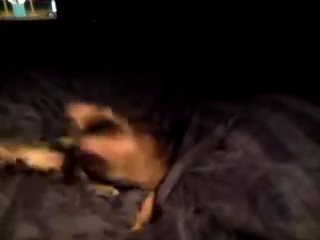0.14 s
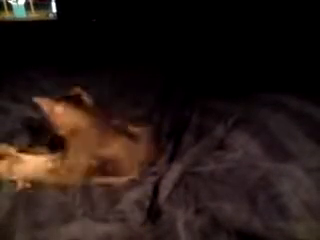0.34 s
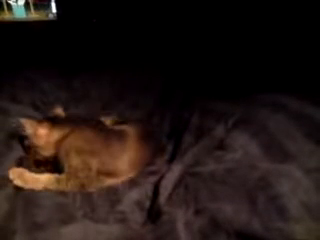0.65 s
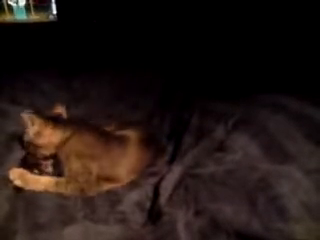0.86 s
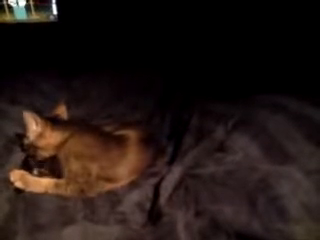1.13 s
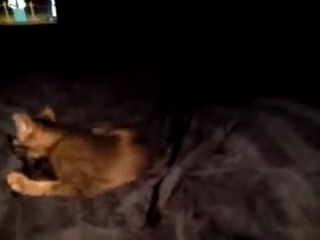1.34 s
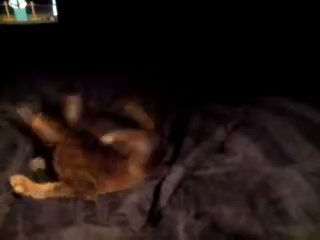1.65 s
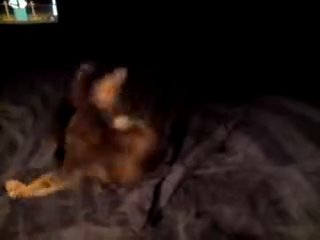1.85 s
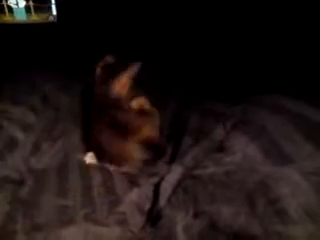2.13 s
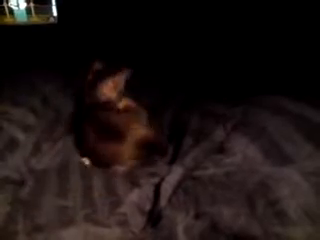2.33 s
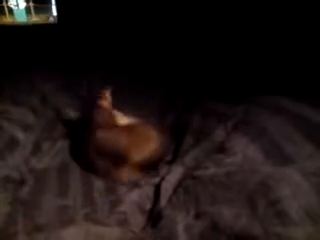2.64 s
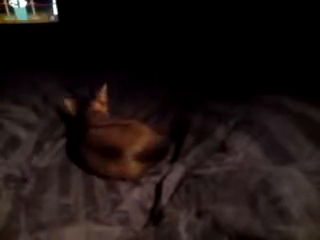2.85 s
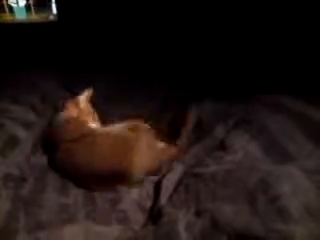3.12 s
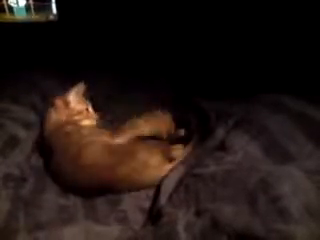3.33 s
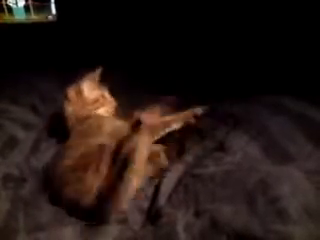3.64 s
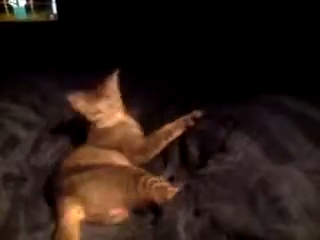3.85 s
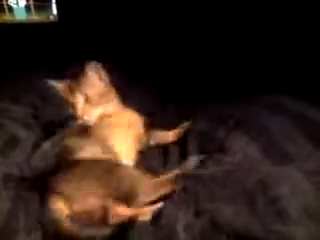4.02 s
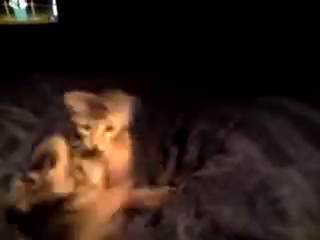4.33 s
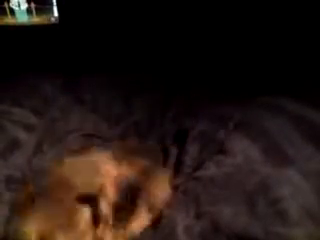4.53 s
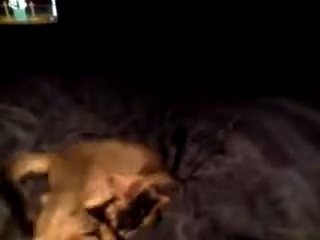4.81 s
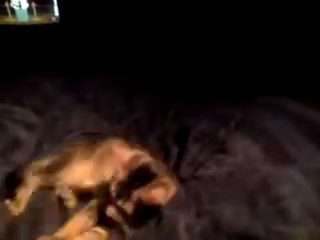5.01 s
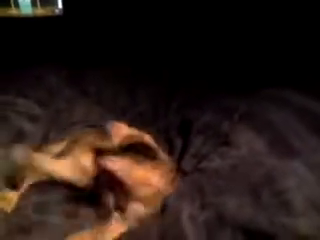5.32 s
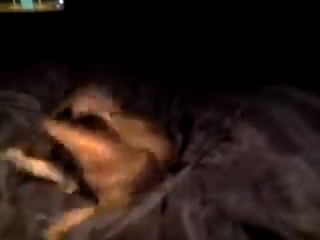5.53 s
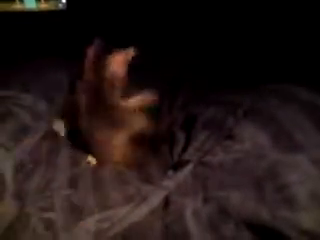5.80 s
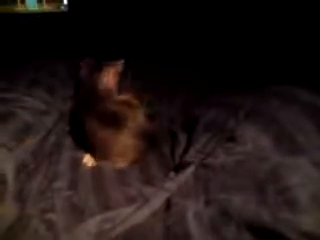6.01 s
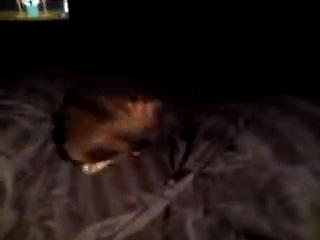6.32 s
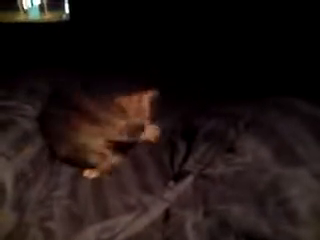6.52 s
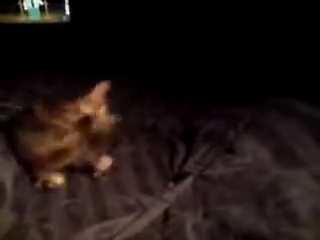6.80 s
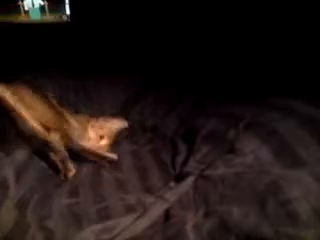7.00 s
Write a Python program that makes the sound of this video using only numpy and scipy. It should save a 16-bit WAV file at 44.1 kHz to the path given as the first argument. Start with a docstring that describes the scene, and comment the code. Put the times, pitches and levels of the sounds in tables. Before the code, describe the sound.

Restless cloth rustling, tiny claw crackles and soft low thumps from a kitten playing on a bed, broken once by a loud hard click.

```python
"""A quiet room with a blanket over a soft bed, where a kitten rolls and scrabbles, heard by one small microphone.
Fur and paws rub the cloth: shaped hiss and clumped fibre clicks, swelling and fading with each stroke.
The weight shoves the bedding (lumpy low noise); paw pats and body drops are short decaying sines.
Claws catch threads in brief ringing crackles, taut cloth squeaks faintly as a wavering tone,
and once something small and hard snaps sharply: a handful of modes over the steady room noise."""
import sys
import numpy as np
from scipy import signal
from scipy.fft import rfft, irfft
from scipy.io import wavfile

SR = 44100
rng = np.random.default_rng(int(sys.argv[2]) if len(sys.argv) > 2 else 0)


def materialize(psi):
    """Save the field psi as 16-bit PCM at rate SR to the path in sys.argv[1].

    A 1-D psi becomes a single channel; in a 2-D psi each row is a channel.
    """
    bounded = np.clip(np.atleast_2d(psi).T, -1, 1)
    quanta = np.round(bounded * 32767).astype(np.int16)
    wavfile.write(sys.argv[1], SR, quanta)


N = 315756

# Strokes of paw or flank over the cloth: start_s (at full strength), hold_s, rub_level_db,
# fur_hiss_db (against the rubbing), weight_level_db (on the bedding), padding_level_db
STROKES = [(0.045, 0.038, -51.5, 2.2, -44, -50), (0.099, 0.097, -50, -1.5, -46, -55.2),
           (0.301, 0.059, -43.5, -6.0, -40.8, -44.5), (0.454, 0.049, -46.3, -3.7, -48, -53),
           (0.543, 0.018, -49, -1, -52, -67), (0.633, 0.047, -49.5, -1, -57, -56.7),
           (0.699, 0.104, -54.5, -2, -46, -65), (0.835, 0.12, -53.5, -1.7, -56.1, -65),
           (1.266, 0.019, -55, -4.5, -51, -69), (1.374, 0.024, -50.5, -6.5, -47, -54.9),
           (1.502, 0.069, -53, -3, -57, -57), (1.611, 0.112, -58.7, -6, -56, -63),
           (1.769, 0.046, -47.5, -2, -54, -61.7), (1.834, 0.065, -60.5, -2, -47.5, -58.5),
           (2.003, 0.013, -50.5, -0.7, -44, -53.5), (2.043, 0.04, -55, -1.5, -63, -54.5),
           (2.097, 0.0054, -51, 0.5, -45, -58), (2.19, 0.019, -50, -4.5, -41.5, -54),
           (2.252, 0.009, -46, -2, -44, -49.5), (2.501, 0.025, -43.5, -3.5, -38, -43.5),
           (2.557, 0.101, -52, -2, -44.5, -58.5), (2.706, 0.054, -52.5, -3, -50, -57.4),
           (2.973, 0.058, -56, -3, -48, -55.5), (3.041, 0.199, -56.5, -4.4, -56, -62),
           (3.259, 0.06, -53.5, -2, -61, -53), (3.497, 0.014, -46.5, -6, -40.6, -53),
           (3.568, 0.075, -51, -4, -42, -55), (3.687, 0.005, -46, -5, -60, -54),
           (3.749, 0.007, -43, -5, -38, -48), (3.858, 0.05, -44.5, -13, -48, -51.5),
           (3.962, 0.042, -48.5, -16, -56, -53), (4.045, 0.025, -39.5, -8, -42.5, -44.5),
           (4.19, 0.007, -48.7, -1.5, -47, -47), (4.29, 0.005, -46, -5.0, -45, -48.1),
           (4.378, 0.025, -51, -5, -59, -56), (4.414, 0.151, -57, -1.5, -51, -68),
           (4.555, 0.0072, -55, -2, -47.7, -49), (4.636, 0.086, -48.0, -3, -41, -52),
           (4.736, 0.063, -49.5, -5, -46, -59), (4.862, 0.045, -53.5, 0, -51, -58.5),
           (4.963, 0.075, -50, -2.8, -45, -54), (5.086, 0.11, -52, -1.2, -49.5, -54.5),
           (5.404, 0.056, -49, -0.8, -47, -52), (5.505, 0.014, -43.5, -2.3, -41.5, -50.5),
           (5.582, 0.045, -46, -4.5, -49, -51), (5.655, 0.059, -47.0, -2, -42.5, -52),
           (5.788, 0.11, -51.5, 0.3, -48.5, -51), (6.001, 0.014, -46, -1, -46, -48.5),
           (6.017, 0.015, -48, 0, -42.5, -59), (6.073, 0.11, -64, -6, -49, -66.0),
           (6.391, 0.114, -54, -2, -46, -55.5), (6.642, 0.0092, -43, -6.5, -36, -48),
           (6.891, 0.095, -52.0, -1.7, -53, -51.5), (7.03, 0.1, -51.9, -0.2, -62.0, -63)]
# Restlessness between strokes: time_s, rub_level_db, weight_level_db (on the bedding)
RESTLESS = [(0.0, -46.5, -43.5), (0.8, -62, -55.5), (1.59, -58.5, -55), (2.39, -56.5, -54.5),
            (3.18, -61, -53), (3.98, -51.5, -53), (4.77, -58, -55.5), (5.57, -59.8, -53.5),
            (6.36, -55.5, -52), (7.16, -52, -46.5)]
# Spectrum of rubbed cloth: frequency_hz, relative_level_db (per Hz)
CLOTH_SPECTRUM = [(290, -19), (500, -4.5), (624, -4), (744, -7), (1100, -5), (1200, -5.5), (1540, -4.5),
                  (1900, -0.5), (3610, -7), (4700, -1.5), (6550, -13), (7000, -24), (9100, -53.5),
                  (15400, -120)]
# Spectrum of the shoved bedding: frequency_hz, relative_level_db (per Hz)
BEDDING_SPECTRUM = [(11, -32.5), (18, 5.5), (32, 2.5), (92, -4), (113, -3.5), (160, -18), (210, -57),
                    (350, -120)]
# Spectrum of the padding under the paws: frequency_hz, relative_level_db (per Hz)
PADDING_SPECTRUM = [(88, -29.5), (150, -11.5), (167, -5.5), (243, 2), (403, -10), (613, -14.5),
                    (800, -10.5), (1040, -48.5), (1760, -120)]
# Claws catching threads: start_s, ring_peak_db, ring_hz, crackle_t60_s,
# crack_db and tug_db (both against the ring peak, before their own shaping)
CLAW_CATCHES = [(.2915, -30, 1390, 0.006, -17, 3), (0.2968, -26.5, 1760, 0.011, -16, 1.5),
                (0.325, -31, 1900, 0.0055, -11, 5.5), (0.358, -36, 1090, 0.0063, -13, -16),
                (.376, -29.5, 1750, .006, -4.5, -21), (0.4433, -37.5, 2290, 0.015, -9, -18),
                (.4743, -32, 2120, 0.0044, -9.5, 5.5), (0.5264, -40.5, 2380, .01, 5.5, -20),
                (.5522, -23.5, 1780, 0.035, -6.5, -22), (0.6465, -29.5, 3000, 0.0041, -2, -4.5),
                (0.663, -34.5, 1430, 0.021, -8.5, -12), (0.6844, -31.5, 2100, 0.0029, 7.5, -27),
                (1.3966, -42, 1470, 0.018, -12.5, -20), (2.0047, -39, 2060, .018, -4, -20),
                (2.0933, -38.5, 2030, 0.0099, -1, -14), (2.169, -34.5, 5130, 0.014, -21, -24),
                (2.5006, -32.5, 1970, .012, 3, -10), (2.509, -34.5, 2200, .01, -6.5, -11),
                (2.531, -29, 1220, 0.0039, -9.5, 1), (2.6187, -37, 2230, 0.014, -5.5, -11),
                (3.498, -32.5, 2780, 0.017, -25, -12), (3.7399, -30, 2600, .026, -7, -18),
                (3.7544, -39, 2190, 0.006, 0, -17), (3.795, -29.5, 4200, 0.013, -2.5, -17),
                (3.8445, -28.5, 1350, 0.017, -12, -17), (3.9484, -37, 1890, .008, -18, -15),
                (4.033, -23.5, 1110, 0.0083, -11, -27), (4.0483, -29, 1120, 0.01, -10.5, -18),
                (4.063, -35, 2260, .019, -6.5, -3), (4.0822, -31.5, 2320, 0.011, -1.5, -15),
                (4.187, -29, 2400, .015, -7.5, 1.5), (4.2828, -29.5, 1340, 0.008, -11, -12),
                (4.2915, -27.5, 1250, .02, -12.5, -24), (4.4733, -26.5, 2270, 0.015, -8.5, -26),
                (4.7344, -29.5, 1870, 0.007, -16, -1), (5.431, -40.5, 2090, 0.011, -0.5, -8),
                (5.4946, -30.5, 2360, .007, -3.5, 2.5), (5.622, -37, 2860, .01, -7.5, -14),
                (5.6542, -35.5, 2460, 0.013, -13.5, -6), (5.7066, -21, 4460, 0.0068, -7.5, -8.5),
                (5.7886, -36.5, 1960, .004, 1.5, -3), (6.0158, -37.5, 2260, 0.036, -7, -8),
                (6.4658, -31.5, 4580, .01, -2, -14), (6.482, -34, 2000, 0.0066, -15.5, -1.5),
                (6.6308, -33.5, 4530, .012, 5, -15.5), (6.648, -30, 5040, 0.0041, -12, -10),
                (6.665, -35, 1620, 0.0058, -14, -2), (7.1196, -33, 2060, .005, -5.5, 4)]
# Paw pats on the bed: start_s, level_db (before swell and decay), ring_hz
PAW_PATS = [(.233, -27, 276), (.442, -34.5, 258), (2.453, -34, 270), (2.519, -29, 244), (2.617, -29, 283),
            (3.509, -29.5, 259), (3.846, -45, 248), (3.891, -28.5, 256), (4.047, -30, 326),
            (4.182, -28.5, 249), (4.289, -31, 243), (4.722, -35, 224), (5.704, -35.5, 277),
            (6.447, -35.5, 276), (6.618, -51, 294)]
# The body drops its weight on the bed: start_s, level_db (before swell and decay), ring_hz
BODY_THUMPS = [(.286, -32, 45.8), (.429, -30, 94.2), (1.366, -32, 48), (2.506, -35, 125),
               (2.508, -47, 51.4), (2.952, -35.5, 108), (3.594, -33, 91), (4.454, -31, 71),
               (4.545, -34, 110.5), (5.124, -26, 92), (5.496, -26.5, 72.5), (5.774, -50, 86.1),
               (5.982, -36, 116), (6.638, -45, 67.3)]
# Modes of the small hard object: mode_hz, level_db (before swell and decay), t60_s
SNAP_MODES = [(670, -17.5, .0125), (1700, -14, .009), (2900, -2, .0045), (4240, -11.5, .015),
              (4430, -3.5, .009), (5260, 2.5, .0065), (5420, -2, .009)]
# Faint squeaks of taut cloth: start_s, length_s, pitch_hz, level_db
SQUEAKS = [(2.569, 0.025, 2100, -47), (3.197, 0.045, 2210, -52), (4.97, 0.044, 1900, -54)]
# Spectrum of the room noise: frequency_hz, relative_level_db (per Hz)
ROOM_SPECTRUM = [(12, -34.5), (20, 1), (73, -5.5), (165, -5.5), (256, -1.5), (872, -20), (1960, -25.5),
                 (3440, -19), (4850, -28.5), (6350, -22.5), (7000, -37), (9100, -67.5), (15400, -120)]

SWELL_DB_PER_S, FADE_DB_PER_S = 482.5, 212  # before and after each stroke's hold
FUR_REST_DB, PAD_REST_DB = -3.5, -9.5  # between strokes: fur against rubbing, padding against weight
PAT_T60_S, THUMP_T60_S = 0.048, 0.11
SNAP_S = 5.5797
ROOM_DB = -57.5
OVERLOAD = 0.7  # sample value where the microphone path clips
CUTOFF_HZ, TOP_HZ = 7250, 16800  # stopband edges before and after the clipping


def from_db(db):
    """Decibels to gain."""
    return 10 ** (np.asarray(db) / 20)


def rms_one(x):
    """Scale to rms 1."""
    return x / np.sqrt(np.mean(x ** 2) + 1e-20)


def in_time(rows):
    """Draw straight lines through a curve table: each column at every sample."""
    s, *columns = np.transpose(rows)
    return [np.interp(np.arange(N) / SR, s, column) for column in columns]


def drift(rate_hz):
    """Slow random wander of rms 1: coarse noise through a double one-pole low-pass."""
    step = 20  # samples between coarse points
    pole = np.exp(-2 * np.pi * rate_hz * step / SR)
    noise = rng.standard_normal(N // step + 2002)
    slow = signal.lfilter([1], [1, -2 * pole, pole ** 2], noise)[2000:]  # skip the filter's start-up
    return np.interp(np.arange(N) / step, np.arange(len(slow)), rms_one(slow))


def colour(x, spectrum):
    """Give x a spectrum with its minimum phase, so that nothing sounds early; rms 1."""
    hz, db = np.transpose(spectrum)
    grid = np.maximum(np.fft.rfftfreq(8192, 1 / SR), 1)
    log_gain = np.interp(np.log(grid), np.log(hz), db) * np.log(10) / 20
    cepstrum = irfft(log_gain)
    # Folding the cepstrum onto positive time makes the phase minimum.
    cepstrum[1:4096] *= 2
    cepstrum[4097:] = 0
    impulse = irfft(np.exp(rfft(cepstrum)))
    return rms_one(signal.fftconvolve(x, impulse)[:N])


def ringing(hz, t60, rise_s):
    """A sine that swells over rise_s and loses 60 dB in t60 seconds; height 1 before both."""
    t = np.arange(round(t60 * SR)) / SR
    swell = -np.expm1(-t / rise_s)
    return np.sin(2 * np.pi * hz * t) * from_db(-60 * t / t60) * swell


def add(out, s, sound):
    """Mix a sound into out from time s on."""
    at = round(s * SR)
    out[at:at + len(sound)] += sound[:N - at]


def motion(rest_db, peaks_db):
    """Each stroke swells, holds and fades, straight in dB; powers add over the resting level."""
    t, power = np.arange(0, N + 64, 64) / SR, 0
    for (s, hold_s, *_), db in zip(STROKES, peaks_db):
        swell_loss_db = SWELL_DB_PER_S * np.maximum(s - t, 0)
        fade_loss_db = FADE_DB_PER_S * np.maximum(t - s - hold_s, 0)
        power = power + from_db(db - swell_loss_db - fade_loss_db) ** 2
    return 10 * np.log10(np.interp(np.arange(N) / SR, t, power) + from_db(rest_db) ** 2)


def fibres(per_s, spread_db, clump_db):
    """Tiny slips of fibre over fibre: random clicks of uneven size that come in clumps; rms 1."""
    size_db = spread_db * np.minimum(rng.exponential(1, N), 4)
    sizes = from_db(size_db) * rng.choice([-1, 1], N)
    chance = per_s * from_db(clump_db * drift(25)) / SR
    return rms_one(sizes * (rng.random(N) < chance))


def rubbing(rub_db, fur_db):
    """Smooth hiss plus fibre slips through the cloth; the top band is the finer hiss of the fur."""
    hiss = rng.standard_normal(N) * from_db(1.0 * drift(43))
    slips = fibres(per_s=550, spread_db=4, clump_db=6.5)
    grain = 0.49 * from_db(0.5 * (rub_db - rub_db.mean()))  # harder strokes crackle more
    friction = (hiss + grain * slips) / np.sqrt(1 + grain ** 2)
    cloth = colour(friction, CLOTH_SPECTRUM)
    high_pass = signal.butter(3, 3300, "high", fs=SR, output="sos")
    fur = signal.sosfiltfilt(high_pass, cloth)
    return from_db(rub_db) * rms_one(cloth - fur) + from_db(fur_db) * rms_one(fur)


def bedding(shove_db, pad_db):
    """The weight rolls the bedding in low lumps; the padding under the paws murmurs above them."""
    lumps = rng.standard_normal(N) * from_db(2 * drift(8))
    shove = colour(lumps, BEDDING_SPECTRUM)
    slips = fibres(per_s=100, spread_db=2, clump_db=4)
    pad = colour(rng.standard_normal(N) + 1.47 * slips, PADDING_SPECTRUM)
    return from_db(shove_db) * shove + from_db(pad_db) * pad


def claws():
    """A plucked thread slips free in a short crackle: heard bright, through a brief ring, and as a dull tug."""
    out, cracks = np.zeros(N), np.zeros(N)
    bursts = rng.standard_normal((len(CLAW_CATCHES), 900))
    for (s, db, hz, t60, crack_db, tug_db), burst in zip(CLAW_CATCHES, bursts):
        crackle = from_db(-60 * np.arange(900) / SR / t60) * burst
        crackle[0] = 2.7  # a firm first slip
        ring = np.convolve(crackle, ringing(hz, 7.5 / hz, rise_s=0.0001))
        tug = -ringing(520, 0.01, rise_s=0.00031)
        add(cracks, s, from_db(db + crack_db) * crackle)
        add(out, s, from_db(db) * ring / np.abs(ring).max())
        add(out, s, from_db(db + tug_db) * tug)
    return out + cracks.std() * colour(cracks, CLOTH_SPECTRUM)


def soft_blows(events, t60, rise_s):
    """A soft blow sets the bedding and the air under it ringing for a few cycles."""
    out = np.zeros(N)
    for s, db, hz in events:
        add(out, s, from_db(db) * ringing(hz, t60, rise_s))
    return out


def snap():
    """One hard contact, swelling over a millisecond, rings all modes of the small object at once."""
    out = np.zeros(N)
    for hz, db, t60 in SNAP_MODES:
        add(out, SNAP_S, from_db(db) * ringing(hz, t60, rise_s=0.001))
    return out


def squeaks():
    """Stick and slip turns regular for a moment: a near tone that wavers in pitch and level."""
    out, waver, flutter = np.zeros(N), drift(36.3), drift(60)
    for s, length_s, hz, db in SQUEAKS:
        span = slice(round(s * SR), round((s + length_s) * SR))
        pitch_hz = hz * (1 + 0.04 * waver[span])
        phase = 2 * np.pi * np.cumsum(pitch_hz) / SR
        envelope = np.sqrt(2 * np.hanning(len(phase)))
        out[span] += from_db(db + 1.3 * flutter[span]) * envelope * np.sin(phase)
    return out


def room_noise():
    """The quiet room: steady noise with a fixed spectrum."""
    return from_db(ROOM_DB) * colour(rng.standard_normal(N), ROOM_SPECTRUM)


def scene():
    """All sources over the steady room noise, alike in both channels."""
    rest_db, weight_db = in_time(RESTLESS)
    rub, fur, weight, pad = np.transpose(STROKES)[2:]
    rub_db = motion(rest_db, rub)
    fur_db = motion(rest_db + FUR_REST_DB, rub + fur)
    shove_db = motion(weight_db, weight)
    pad_db = motion(weight_db + PAD_REST_DB, pad)
    kitten = rubbing(rub_db, fur_db) + bedding(shove_db, pad_db) + claws()
    pats = soft_blows(PAW_PATS, PAT_T60_S, rise_s=0.0004)
    thumps = soft_blows(BODY_THUMPS, THUMP_T60_S, rise_s=0.006)
    mono = kitten + pats + thumps + snap() + squeaks() + room_noise()
    return np.array([mono, mono])


def record(dry):
    """The microphone path ends steeply; peaks past OVERLOAD clip and splash above that; the very top is cut."""
    narrow = signal.sosfilt(signal.cheby2(20, 40, CUTOFF_HZ, fs=SR, output="sos"), dry)
    clipped = np.clip(narrow, -OVERLOAD, OVERLOAD)
    return signal.sosfilt(signal.cheby2(12, 60, TOP_HZ, fs=SR, output="sos"), clipped)


dry = scene()
out = record(dry)
materialize(out)
```